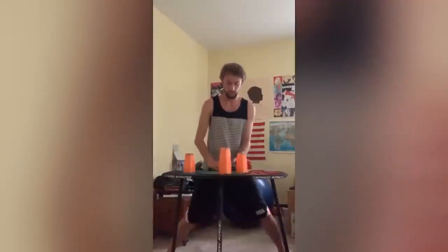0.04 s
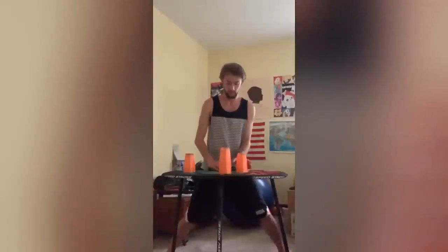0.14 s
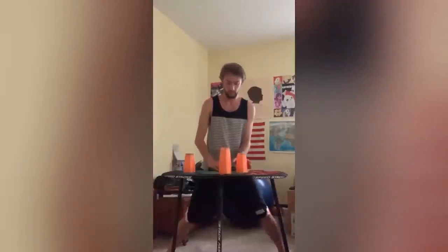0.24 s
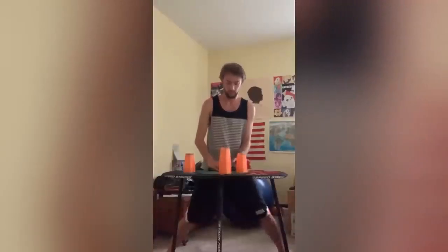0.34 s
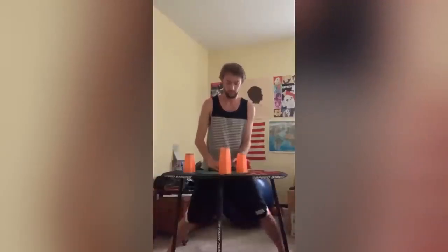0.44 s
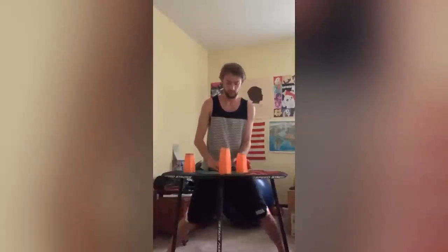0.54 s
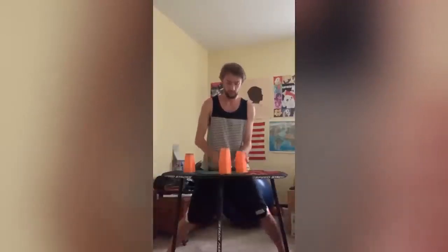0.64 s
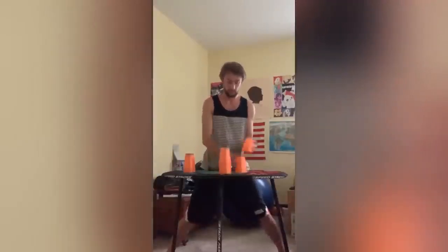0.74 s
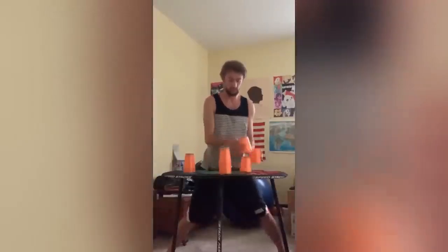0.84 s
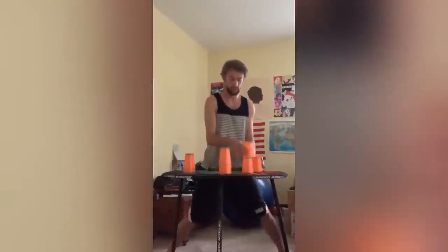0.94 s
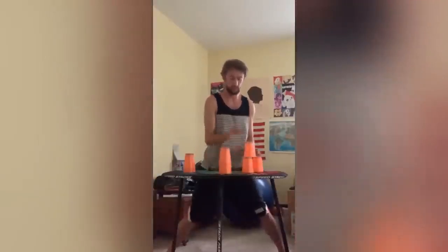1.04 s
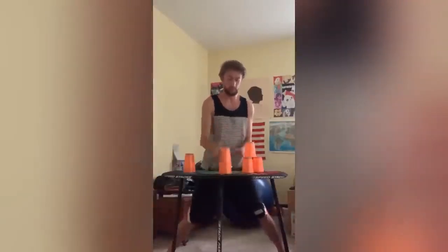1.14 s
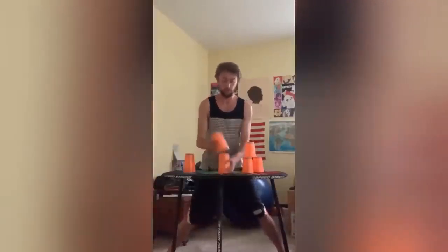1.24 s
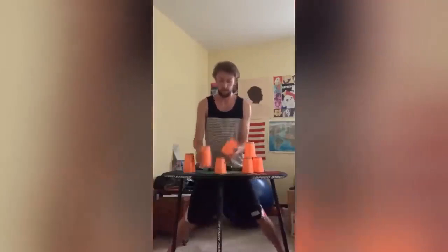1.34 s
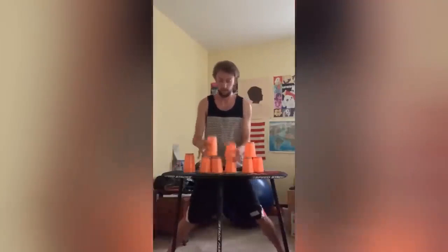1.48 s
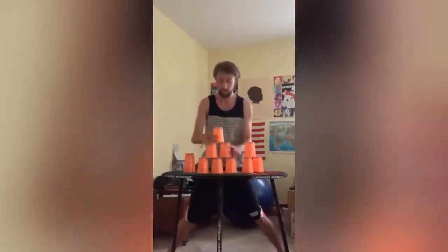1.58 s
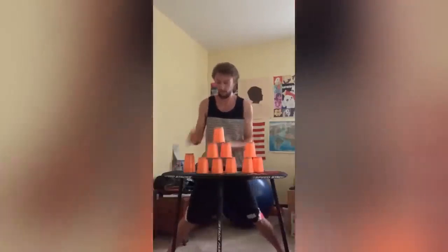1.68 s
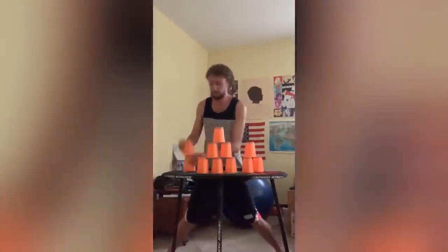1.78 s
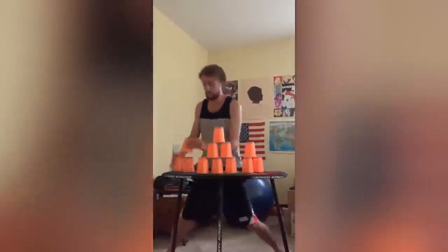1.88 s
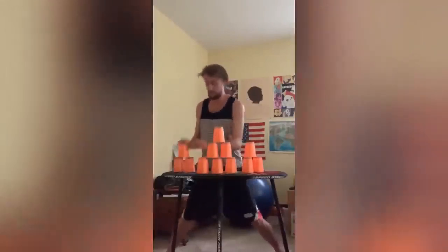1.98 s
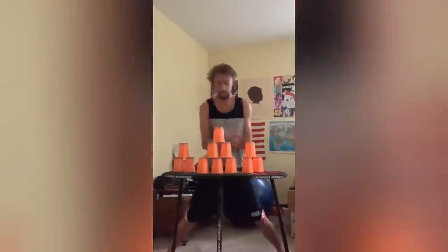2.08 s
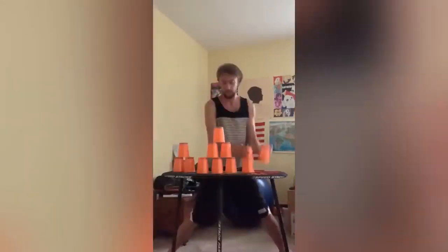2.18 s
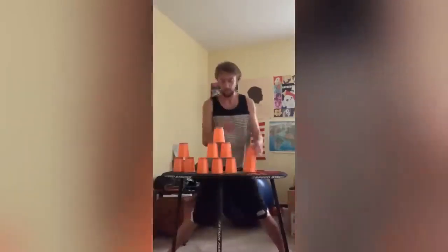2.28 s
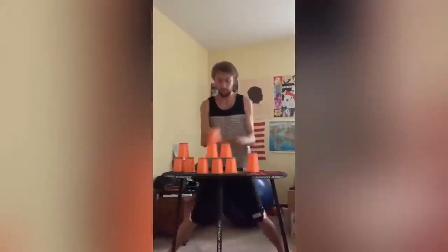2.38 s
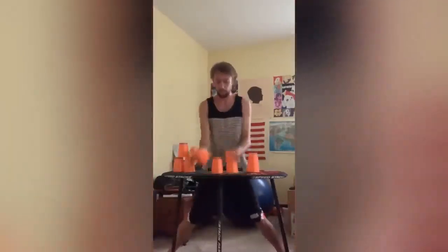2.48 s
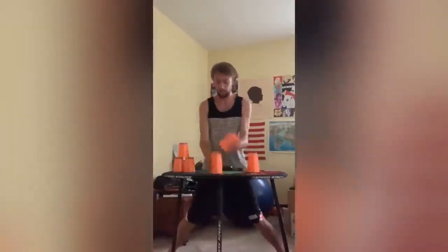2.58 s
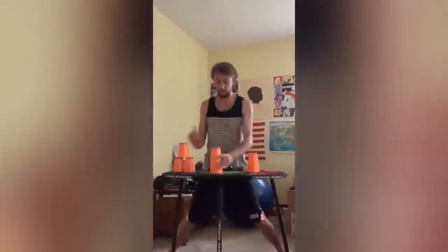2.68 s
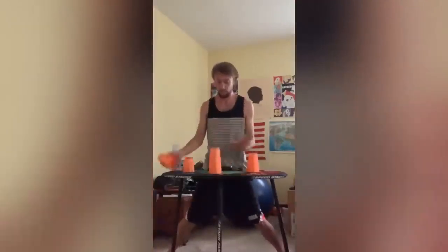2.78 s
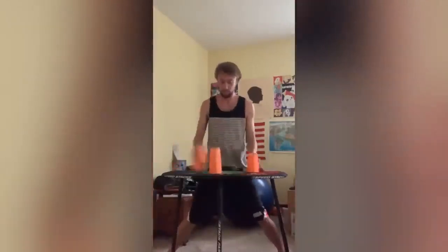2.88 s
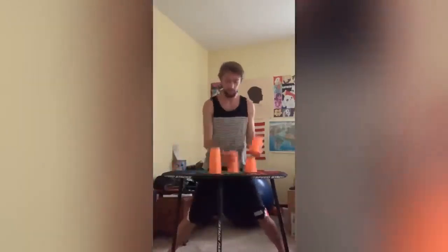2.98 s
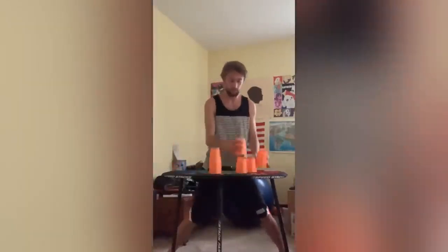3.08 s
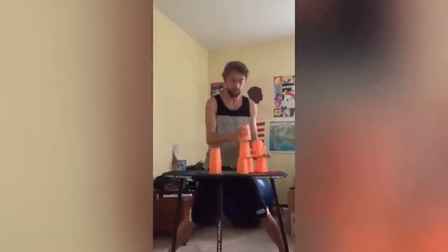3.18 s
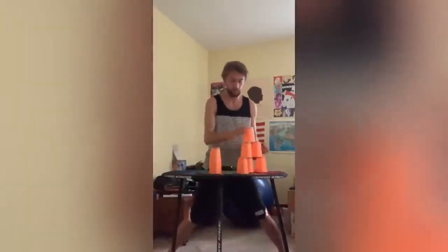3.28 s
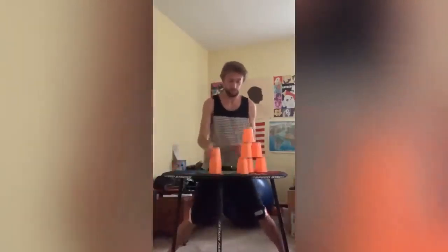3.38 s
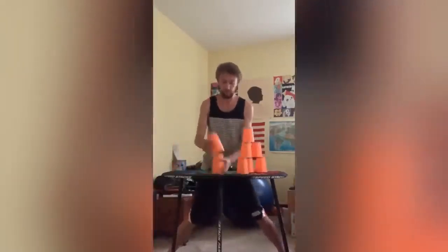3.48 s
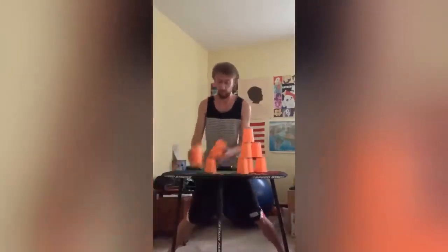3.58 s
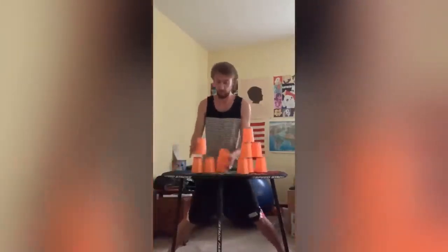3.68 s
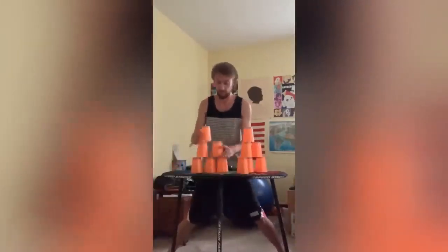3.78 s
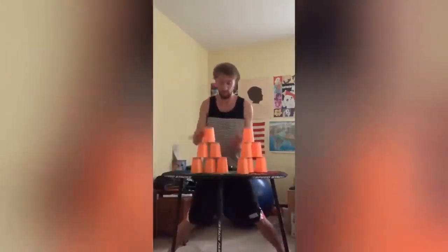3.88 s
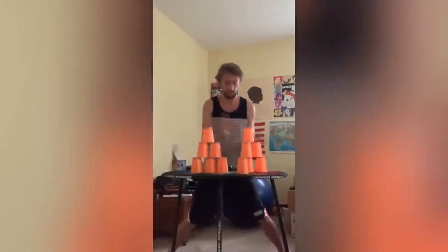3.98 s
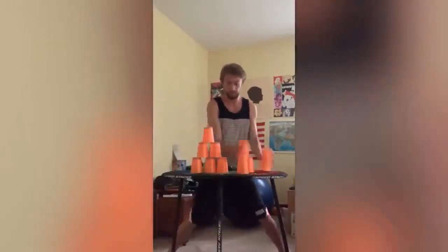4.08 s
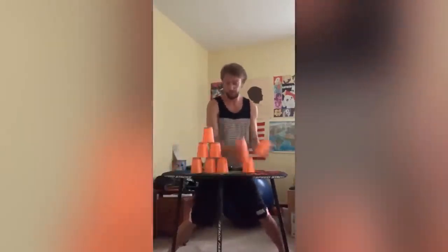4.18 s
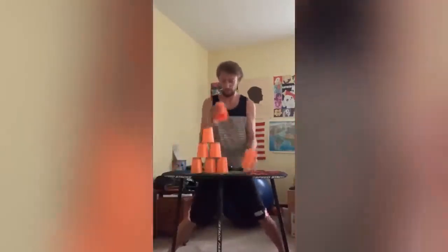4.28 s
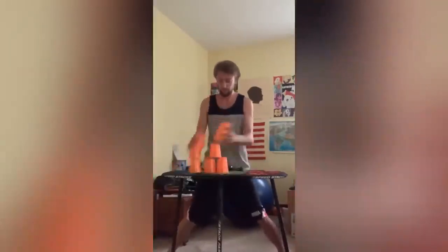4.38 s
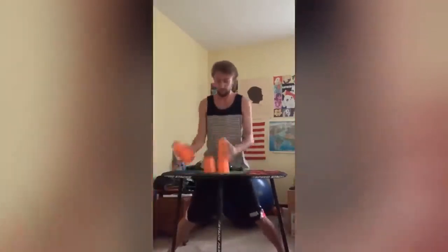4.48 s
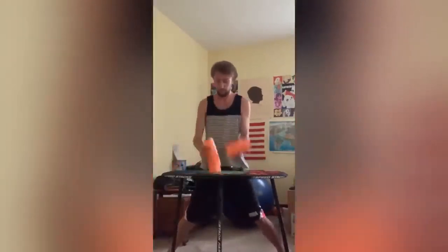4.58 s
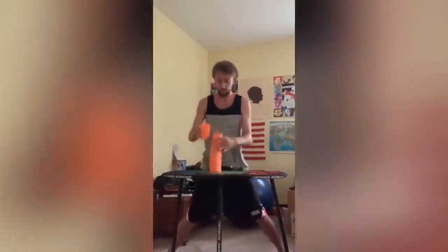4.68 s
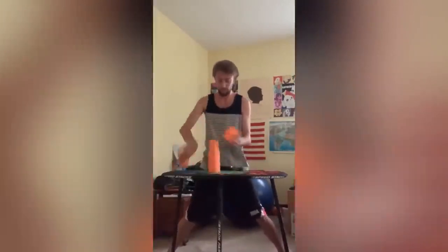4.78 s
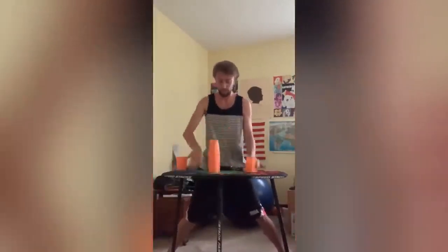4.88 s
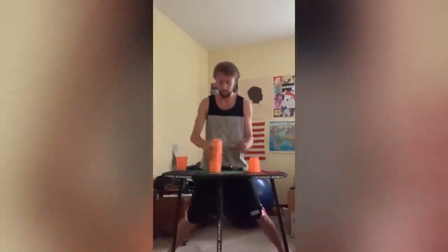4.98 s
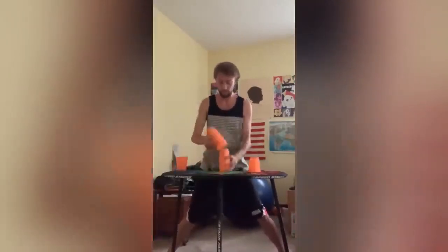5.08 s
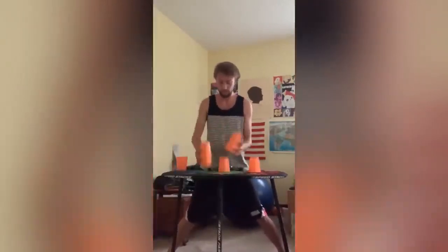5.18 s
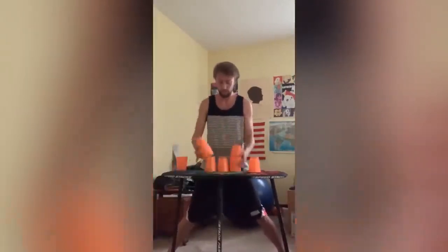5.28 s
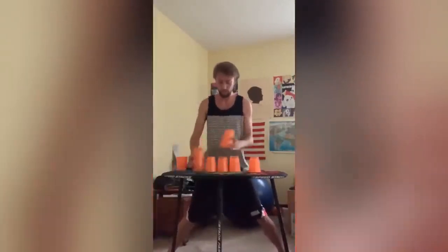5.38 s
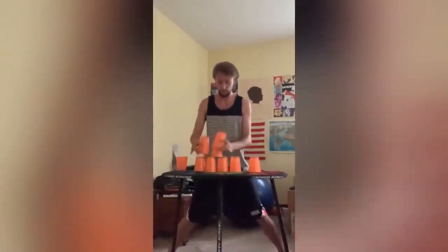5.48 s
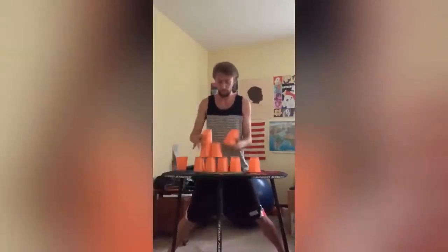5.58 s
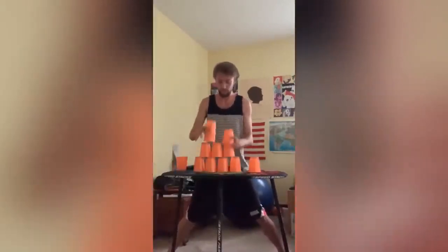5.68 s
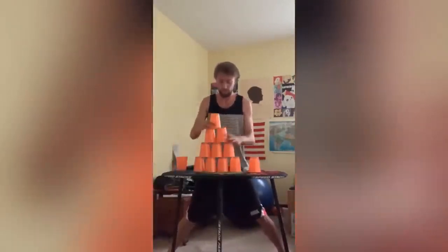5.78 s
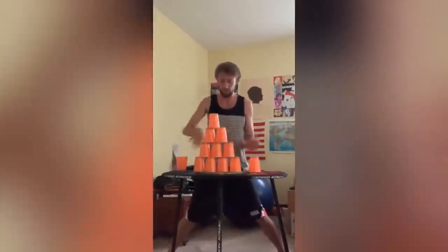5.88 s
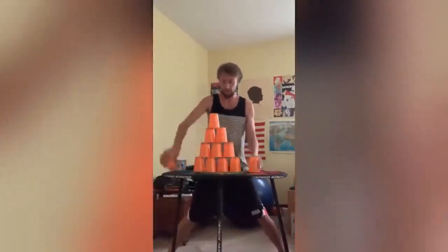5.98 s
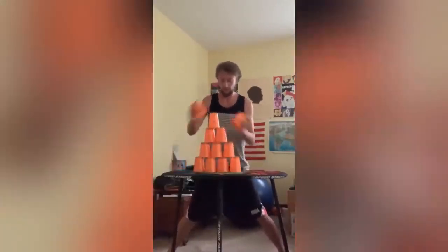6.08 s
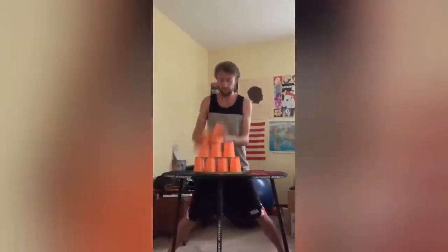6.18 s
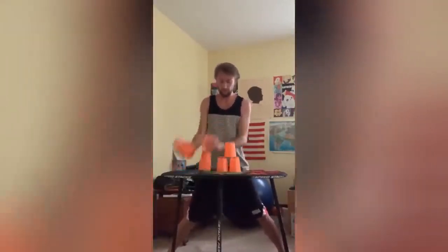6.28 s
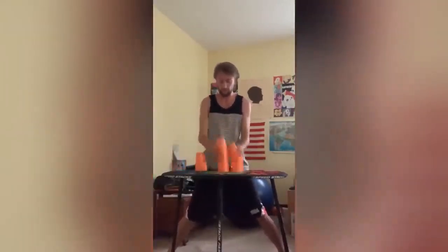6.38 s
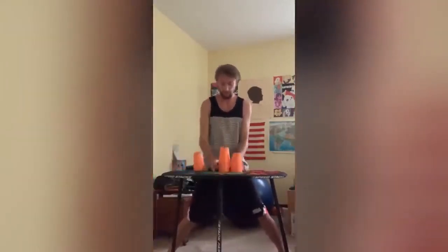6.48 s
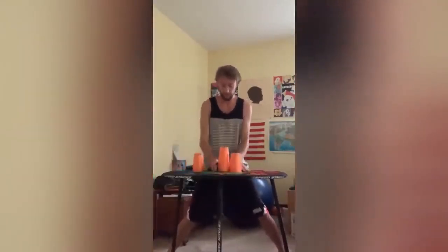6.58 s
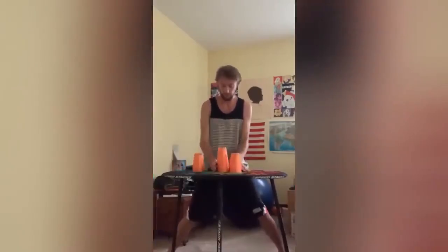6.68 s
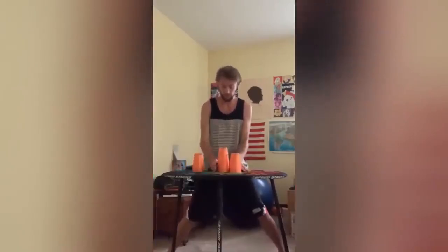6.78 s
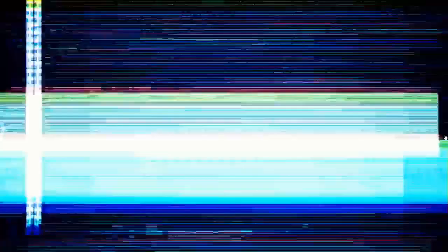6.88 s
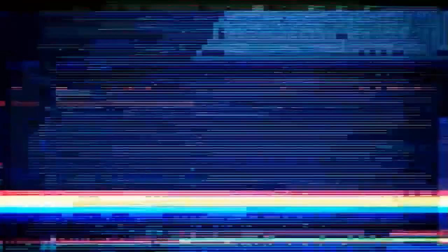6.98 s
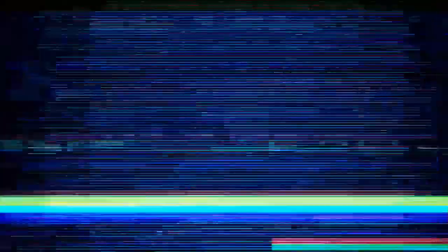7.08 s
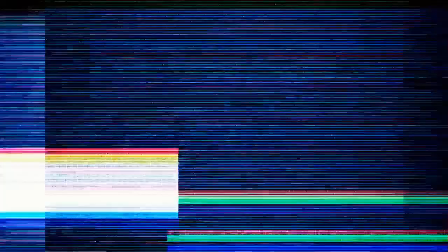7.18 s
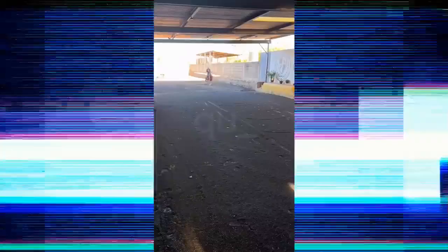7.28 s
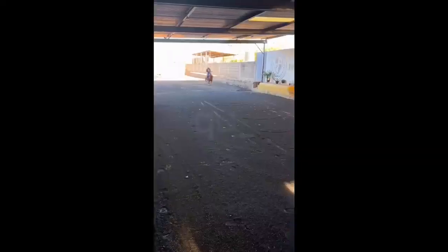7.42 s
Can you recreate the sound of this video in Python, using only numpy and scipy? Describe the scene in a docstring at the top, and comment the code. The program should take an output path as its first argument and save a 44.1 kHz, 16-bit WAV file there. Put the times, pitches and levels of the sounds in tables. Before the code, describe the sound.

Fast hollow plastic cup clacks, rim cracks and soft table thumps in an echoing small room, over faint hum, ending abruptly.

```python
"""Plastic cups clatter fast on a small bedroom table, stacked and unstacked, a few metres from two mic ports.
Blow: a chatter of rim contacts rings cup walls and caught air, and cracks; palm pushes thump the table top.
Pulls are falling air notes, scrapes are stick-slip ticks; noise with decaying echoes gives the room.
Shaped noise and a low mains hum lie beneath; a quick fade cuts the sound off at the end."""
import sys
import numpy as np
from scipy import signal
from scipy.fft import rfft, irfft, next_fast_len
from scipy.io import wavfile
from scipy.ndimage import uniform_filter1d

SR = 44100
rng = np.random.default_rng(int(sys.argv[2]) if len(sys.argv) > 2 else 0)


def int16_out(signal):
    """Quantize to a 16-bit WAV file."""
    q = np.round(np.clip(np.atleast_2d(signal).T, -1, 1) * 32767)
    wavfile.write(sys.argv[1], SR, q.astype(np.int16))


N = 328489

# modes of cup walls and air: [f/Hz, relative level/dB, t60/s]
CUP_MODES = [(415, -8.5, 0.27), (550, 6.5, 0.059), (668.8, 10.5, 0.031), (720, -13, 0.021),
             (844.4, 1.5, 0.086), (942, 5, 0.037), (905, -14.5, 0.043), (1223, 4, 0.0092),
             (1230, -3.5, 0.067), (1313, -3.5, 0.065), (1424, -14, 0.14), (1532, 0.5, 0.034),
             (1817, 3.5, 0.018)]
# rim click spectrum: [f/Hz, level/dB]
RIM_CLICK = [(700, -20.5), (1300, 7.5), (2000, 0.5), (3200, -1.5), (5000, -5.5), (8000, -6.5), (11000, -11),
             (15500, -20)]
# bending walls radiate little bass: [f/Hz, gain/dB]
WALL_RADIATION = [(100, -15), (250, -8.5), (400, -4), (1800, 2.5), (3000, 1)]

LEAD_S = 0.02  # a blow's buffer starts this long before its main contact
BLOW_SIZE = 8192  # samples; also thuds and pulls
SCRAPE_SIZE = 32768  # samples


def undb(db):
    """Decibels to amplitude gain."""
    return 10 ** (np.asarray(db) / 20)


def along(table, size):
    """Read an [f/Hz, value] table at the rfft bins of size samples, on a log frequency axis."""
    hz, value = np.transpose(table)
    bins_hz = np.fft.rfftfreq(size, 1 / SR)
    return np.interp(np.log(bins_hz + 1), np.log(hz), value)


def ring(modes, t, extra_db, detune):
    """Modal response to one push: exponentially decaying sines, unit energy in sum."""
    hz, db, t60_s = np.array(modes).T[:, :, None]
    decay = np.exp(-np.log(1000) * t / t60_s)
    y = np.sum(undb(db + extra_db) * np.sin(2 * np.pi * hz * detune * t) * decay, axis=0)
    return y / np.sqrt(np.sum(y ** 2))


def contact_chatter(count):
    """Wall and rim push trains, unit energy: a short swell of faint ticks, main contact, dying bounces."""
    lead_in_growth_s, bounce_span_s = 0.007, 0.012
    lead_in = 0.7  # end of the lead-in swell, against the first bounces
    wall_side, rim_side = 0.15, 0.33  # scale of the random ticks and bounces; main contact = 1
    when = rng.random(count)
    amp = rng.laplace(size=(2, count))
    lag_s = LEAD_S * (when - 1)
    bounces = slice(count // 3, None)
    lag_s[bounces] = when[bounces] * bounce_span_s
    envelope = np.where(lag_s < 0, lead_in * np.exp(lag_s / lead_in_growth_s), np.exp(-2.5 * when))
    amp *= envelope * np.array([[wall_side], [rim_side]])
    lag_s[0], amp[:, 0] = 0, 1  # main contact
    index = np.minimum((lag_s + LEAD_S) * SR, 5000).astype(int)
    push = np.zeros((2, BLOW_SIZE))
    for row in range(2):
        np.add.at(push[row], index, amp[row])
    return push / np.sqrt(np.sum(push ** 2, axis=1, keepdims=True))


def cup_body(ring_hz):
    """Wall and air modes, favouring those near ring_hz, plus caught air; detuned anew each blow."""
    near_db, near_log_ratio = 8.5, 0.1  # lift of modes near ring_hz, its log-frequency width
    hollow_hz, hollow_db = 760, 0.5  # lift of the air modes below hollow_hz
    caught_db, caught_t60_s = -5, 0.022
    contact_s = 0.0012  # time constant of ring onset
    t = np.arange(BLOW_SIZE) / SR
    level_scatter = rng.standard_normal((len(CUP_MODES), 1))
    tune_scatter = rng.standard_normal((len(CUP_MODES), 1))
    hz = np.array(CUP_MODES)[:, :1]
    lift_db = near_db * np.exp(-(np.log(hz / ring_hz) / near_log_ratio) ** 2)
    lift_db = lift_db + hollow_db * (hz < hollow_hz)
    walls = ring(CUP_MODES, t, lift_db + 2.5 * level_scatter, 1 + 0.01 * tune_scatter)
    caught_air = ring([(ring_hz, 0, caught_t60_s)], t, 0, 0.98)  # 2 % below ring_hz
    return (walls + undb(caught_db) * caught_air) * (1 - np.exp(-t / contact_s))


def rim_colour():
    """Click spectrum with three broad rim resonances at random pitches."""
    octave = np.log2(np.fft.rfftfreq(BLOW_SIZE, 1 / SR) + 1)
    peaks = np.log2(2000) + 2.3 * rng.random((3, 1))
    resonances_db = 3 * np.sum(np.exp(-((octave - peaks) / 0.2) ** 2), axis=0)
    return undb(along(RIM_CLICK, BLOW_SIZE) + resonances_db)


def blow(ring_hz, crack_db, count=30):
    """Contact chatter convolved with the radiated cup ring, plus the rim's own crack."""
    wall_push, rim_push = contact_chatter(count)
    walls = rfft(cup_body(ring_hz)) * undb(along(WALL_RADIATION, BLOW_SIZE))
    crack = undb(crack_db) * rim_colour() * rfft(rim_push)
    return irfft(rfft(wall_push) * walls + crack)


def thud():
    """Table boom: a soft palm push, peaking at 12 ms, drives the table-top modes; unit energy."""
    # table-top modes: [f/Hz, relative level/dB, t60/s]
    table_modes = [(136, 2, 0.2), (172, -3.5, 0.15), (218, -3.5, 0.11), (271.2, -5.5, 0.14)]
    t = np.arange(BLOW_SIZE) / SR
    palm = np.exp(-((t - 0.012) / 0.0015) ** 2)
    tilt_db = along([(60, -35.0), (110, -23.0), (350, 10), (600, -38.0)], BLOW_SIZE)
    y = irfft(rfft(palm) * rfft(ring(table_modes, t, 0, 1)) * undb(tilt_db))
    return y / np.sqrt(np.sum(y ** 2))


def pull(from_hz, to_hz, length_s):
    """Cup drawn out of another: the air gap widens, so its breathy note falls."""
    u = np.arange(BLOW_SIZE) / SR / length_s
    hz = to_hz + (from_hz - to_hz) * np.exp(-6 * u)
    phase = 2 * np.pi * np.cumsum(hz) / SR
    breath = uniform_filter1d(rng.standard_normal((2, BLOW_SIZE)), 150, axis=1) * 2.5
    note = (1 + breath[0]) * np.sin(phase) + breath[1] * np.cos(phase)
    return note * (1 - np.exp(-u / 0.02)) * np.exp(-3.0 * u ** 2)


def scrape(length_s, rate_hz=2400.0, spread_db=4.5, walls_db=-5.5):
    """Stick-slip: dense uneven ticks swell and fade, and set the cup walls rattling."""
    t = np.arange(SCRAPE_SIZE) / SR
    slips = rng.random(SCRAPE_SIZE) < rate_hz / SR
    slip_gain = undb(spread_db * rng.exponential(size=SCRAPE_SIZE))
    ticks = slips * slip_gain * rng.choice([-1, 1], SCRAPE_SIZE)
    grip = np.repeat(rng.standard_normal(32), 1024)  # fingers grip and let go
    ticks = ticks * undb(6 * uniform_filter1d(grip, 512))
    swell = np.sin(np.pi * np.minimum(t / length_s, 1)) ** 0.5
    ticks = ticks * swell / np.std(ticks)
    walls = rfft(ring(CUP_MODES, t, 0, 1.0)) * undb(walls_db + along(WALL_RADIATION, SCRAPE_SIZE))
    return irfft(rfft(ticks) * (undb(along(RIM_CLICK, SCRAPE_SIZE)) + walls))


def cups(places=4):
    """Blows, thuds, pulls and scrapes dealt in turn to places on the table, each with its own echoes."""
    # rim blows: [main contact t/s, level/dB, favoured ring f/Hz, crack against ring/dB]
    blows = [(0.181, -19.5, 1800, -5), (0.188, -12, 500, -11), (0.826, -36, 880, -13),
             (0.861, -18.5, 796, -11.5), (0.98, -23.5, 1350, -17), (1.017, -24, 416, -6),
             (1.168, 10.5, 888, -17.5), (1.175, 8, 1280, -7), (1.199, 0, 665, -8),
             (1.408, -18.5, 1230, -3.5), (1.601, 13, 766, -10.5), (1.664, 7.5, 903, -11),
             (1.728, -2.5, 940, -12), (1.788, 10.5, 580, -3), (1.794, 13, 917, -6), (1.81, 4.5, 680, -20.5),
             (1.946, -21, 525, -1), (1.998, -23.5, 430, 9.5), (2.113, 13.5, 910, -10.5),
             (2.124, 10, 640, -22), (2.134, 10.5, 1234, -7.5), (2.357, -12.5, 910, -5),
             (2.475, 2.5, 1235, -0.5), (2.489, 11, 1220, 6), (2.5, 8.5, 425, -14.5),
             (2.593, 0.5, 1250, -8.5), (2.615, 11, 940, -6), (2.623, 6, 1640, -17), (2.632, 8.5, 1230, 8),
             (2.648, 6.5, 520, -12), (2.662, 9, 904, 6), (2.722, 8.5, 924, 2.5), (2.748, 7.5, 565, -11.5),
             (2.791, 1.5, 825, 2), (2.876, 1, 1463, -1), (2.948, 7, 1195, -4.5), (2.984, -12, 1260, 17.5),
             (3.082, -1.5, 788, -10.5), (3.118, -6.5, 840, -20.5), (3.292, -13.5, 1233, 2),
             (3.32, 2.5, 898, -11), (3.345, -0.5, 427, -7), (3.39, -3, 890, -14), (3.417, 7.5, 542, -8.5),
             (3.429, 10, 1320, -6.5), (3.629, -23, 830, -4), (3.834, 12, 830, -7), (3.85, 6, 425, -20.5),
             (3.902, 9, 520, -10.5), (3.972, 4.5, 1030, -14.5), (4.015, 10.5, 640, -12.5),
             (4.036, 11, 1286, -5), (4.044, -2, 1170, -24), (4.052, 8, 606, -19.5), (4.089, 0, 674, -20),
             (4.255, -5, 910, -7.5), (4.279, 5, 826, -1), (4.307, 6.5, 1270, 11), (4.315, -3, 1900, -1),
             (4.328, -3.5, 950, 18), (4.336, 13.5, 840, -5.5), (4.424, 0.5, 675, -41), (4.567, 10, 753, -8),
             (4.587, 9.5, 1210, 2), (4.61, 8, 920, 4), (4.622, 7.5, 1160, -0.5), (4.647, 9.5, 634, -0.5),
             (4.654, 1.5, 780, 6.5), (4.661, 9.5, 415, -28.5), (4.742, 8, 915, 1), (4.755, 7.5, 657, -5.5),
             (4.829, 1.5, 512, -3), (4.925, 7.5, 1138, -4.5), (5.027, 4.5, 910, -19.5),
             (5.08, 12, 872, -15), (5.1, 5, 415, -28.5), (5.21, -4, 1810, -3), (5.284, -17.5, 433, 8),
             (5.432, 9.5, 693, -12.5), (5.502, 6.5, 607, -14.5), (5.614, 7.5, 753, -11.5),
             (5.663, 8, 1033, -12), (5.681, -2.5, 1910, -7), (5.766, -8, 1220, -11.5), (5.778, 3, 576, -14),
             (5.833, -1.5, 650, -9.5), (5.854, 13, 814, -19.5), (5.861, 4, 1160, -7.5),
             (5.912, -2.5, 1190, -11), (5.93, 4, 787, -23.5), (5.965, 6.5, 594, -19.5),
             (5.991, 10.5, 1260, -9.5), (6.018, -2, 1460, -19.5), (6.168, -27.5, 1326, 7),
             (6.361, -6.5, 550, -1), (6.38, 8.5, 1216, 4), (6.385, 4.5, 1290, 6), (6.4, 15, 1050, -2.5),
             (6.407, 8, 930, 5.5), (6.427, 6.5, 990, 7.5), (6.473, 4.5, 620, 0.5), (6.562, 4, 490, -15),
             (6.605, 9.5, 1130, -5.5), (6.631, 3.5, 707, 3.5), (6.655, 5.5, 1435, -5)]
    # table booms under the hands: [palm peak t/s, level/dB]
    thuds = [(0.203, -21.5), (1.009, -27), (1.179, -17.5), (1.428, -24), (1.613, -12.5), (1.973, -22),
             (2.133, -10), (2.375, -16.5), (2.495, -14), (2.802, -17), (3.011, -24.5), (3.355, -23),
             (3.445, -20.5), (3.839, -20), (3.918, -16), (4.346, -17.5), (4.653, -9.5), (4.75, -13),
             (4.84, -36), (5.082, -23), (5.442, -16.5), (5.867, -15), (6.199, -24.5), (6.447, -13),
             (6.635, -13.5)]
    # cups drawn apart: [start t/s, level/dB, from f/Hz, to f/Hz]
    pulls = [(1.405, -44.5, 828, 372), (1.942, -40, 658, 222), (2.355, -35.5, 792, 327),
             (5.274, -36, 755, 335), (5.769, -40, 692, 394), (6.187, -50, 525, 294)]
    # cups sliding on each other or in the fingers: [start t/s, length/s, level/dB]
    scrapes = [(0.238, 0.2, -69), (0.561, 0.071, -84), (0.837, 0.11, -56), (1.41, 0.14, -45.5),
               (1.61, 0.15, -25.5), (1.975, 0.077, -36.5), (2.353, 0.11, -37.5), (2.509, 0.72, -35.5),
               (3.085, 0.065, -34.5), (3.609, 0.28, -50), (3.861, 0.099, -30.5), (4.59, 0.32, -35),
               (5.213, 0.083, -40.5), (5.458, 0.078, -34.5), (5.869, 0.17, -37), (6.159, 0.047, -49)]
    size = next_fast_len(N + 49152)
    sounds = [(s - LEAD_S, blow(ring_hz, crack_db) * undb(db)) for s, db, ring_hz, crack_db in blows]
    sounds += [(s - 0.012, thud() * undb(db)) for s, db in thuds]
    sounds += [(s, pull(from_hz, to_hz, 0.09) * undb(db)) for s, db, from_hz, to_hz in pulls]
    sounds += [(s, scrape(length_s) * undb(db)) for s, length_s, db in scrapes]
    dry_places = np.zeros((places, size))
    for k, (s, sound) in enumerate(sounds):
        start = int(s * SR)
        dry_places[k % places, start:start + len(sound)] += sound
    wet = sum(rfft(place) * rfft(room(), size) for place in dry_places)
    return irfft(wet, size)[:, :N]


def ports(size):
    """Noise spectra at two mic ports, partly common to both."""
    # mixing share of noise common to both ports: [f/Hz, share/0-1]
    common_share = [(100, .99), (200, .95), (330, .6), (600, .05), (1500, .05), (3000, .35), (4500, .78),
                    (15000, .8)]
    both, left, right = rfft(rng.standard_normal((3, size)))
    share = np.clip(along(common_share, size), 0, 1)
    return np.sqrt(share) * both + np.sqrt(1 - share) * np.array([left, right])


def room(size=32768):
    """Impulse response: direct sound, early echoes bunched at the nearest wall, tail decaying per band."""
    # tail decay: [band centre f/Hz, t60/s]
    tail_t60 = [(100, 0.75), (400, 0.6), (1000, 0.57), (2500, 0.61), (6000, 0.44), (12000, 0.32)]
    direct_db, early_db, late_db = 1.5, -24, -33.0  # echo levels per sample, before build-up
    early_share = 0.14  # early t60 / tail t60
    wall_ms, wall_width_ms, wall_db = 13, 1.0, 3  # nearest wall: delay, spread, lift
    gap_ms = 2.0  # build-up time constant of all echoes
    t = np.arange(size) / SR
    noise, echoes = ports(size), 0
    early = undb(early_db + wall_db * np.exp(-((t * 1000 - wall_ms) / wall_width_ms) ** 2))
    # uneven gain in 32-sample steps: first echoes arrive one by one
    sparse = undb(5 * np.repeat(np.minimum(rng.exponential(size=size // 32), 3), 32))
    early = early * sparse / np.sqrt(np.mean(sparse ** 2))
    for centre_hz, t60_s in tail_t60:
        band = along([(hz, float(hz == centre_hz)) for hz, _ in tail_t60], size)
        late_env = undb(late_db) * 1000. ** (-t / t60_s)
        early_env = early * 1000. ** (-t / (early_share * t60_s))
        echoes = echoes + irfft(noise * band) * (late_env + early_env)
    response = echoes * (1 - np.exp(-t * 1000 / gap_ms))
    response[:, 0] += undb(direct_db)
    return response


def room_tone():
    """Shaped noise that swells a little and a wavering mains hum, both sinking slowly."""
    # noise spectrum shape, rescaled below: [f/Hz, relative density/dB]
    air_shape = [(15, -67), (25, -36), (36, -23), (64, -13), (151, -14), (188, -20), (286, -18),
                 (911, -23.5), (1080, -28), (2760, -37.5), (9000, -84), (11700, -115), (19800, -120)]
    # hum partials: [f/Hz, rms level before waver and sink/dB]
    hum_partials = [(59.2, -58), (118.4, -62.5)]
    air_db = -59.5  # rms before swell and sink
    t = np.arange(N) / SR
    size = N + N % 2
    air = irfft(ports(size) * undb(along(air_shape, size)))[:, :N]
    waver = uniform_filter1d(rng.standard_normal((2, N)), 3000, axis=1)
    waver = uniform_filter1d(waver, 3000, axis=1) * 65  # about unit rms
    hum = sum(undb(db + 0.7 * waver[0]) * np.sqrt(2) * np.sin(2 * np.pi * hz * t)
              for hz, db in hum_partials)
    air = air * undb(air_db + 3.0 * waver[1]) / np.std(air)
    sink_db = -0.6 * (t - 3)
    return (air + hum) * undb(sink_db)


def scene():
    """Cups over the room tone."""
    return cups() + room_tone()


def record(dry):
    """Left port lags with less bass; peaks round off, a quick fade ends it, a low-pass cuts the top."""
    # right port over left: [f/Hz, gain/dB]
    right_lift = [(120, 1), (250, 3), (420, 4.5), (650, -0.5), (2000, -0.5)]
    port_lag_samples, top_hz = 5, 15900
    end_s, fade_s = 7.045, 0.014  # fade start, Gaussian sigma
    ceiling = 0.9
    lagged = np.array([np.roll(dry[0], port_lag_samples), dry[1]])
    lift = undb(along(right_lift, N + 1) / 2)  # half up on the right, half down on the left
    heard = irfft(rfft(lagged, N + 1) * np.array([1 / lift, lift]), N + 1)[:, :N]
    fade = np.exp(-np.maximum(np.arange(N) / SR - end_s, 0) ** 2 / fade_s ** 2 / 2)
    rounded = ceiling * np.tanh(heard / ceiling) * fade
    low_pass = signal.ellip(10, 0.2, 90, top_hz, fs=SR, output="sos")
    return signal.sosfilt(low_pass, rounded)


dry = scene()
out = record(dry)
int16_out(out)
```